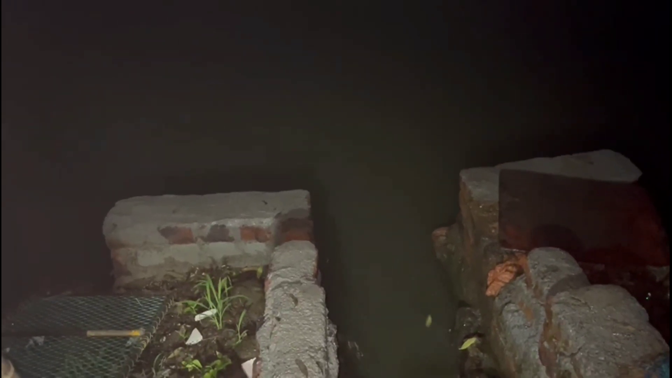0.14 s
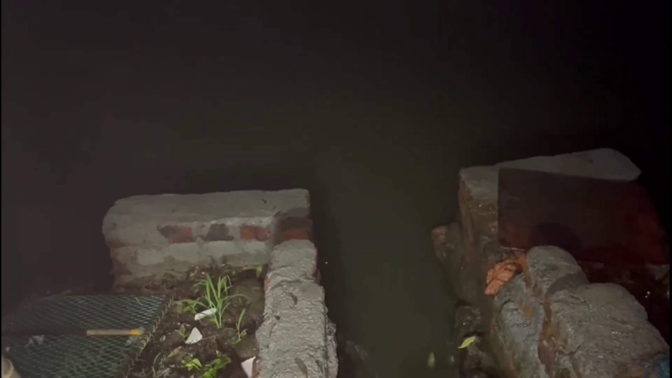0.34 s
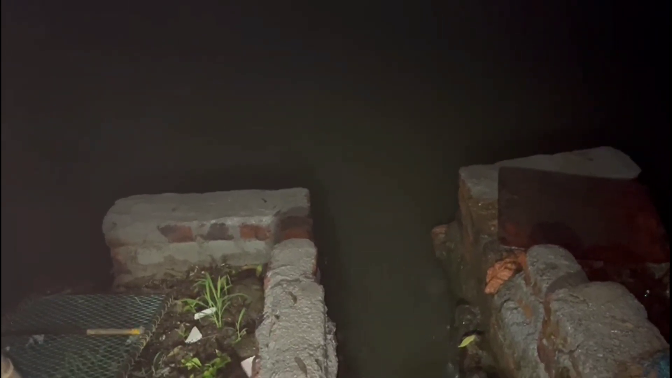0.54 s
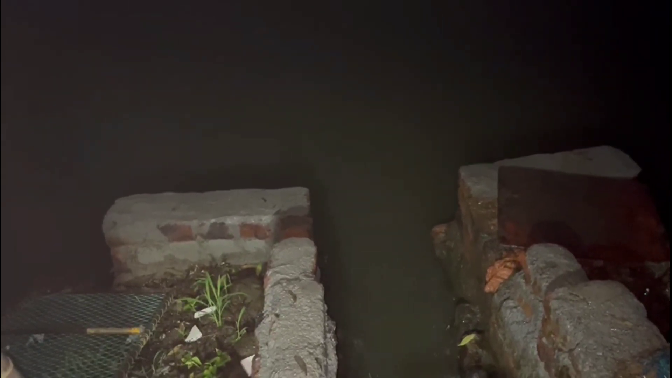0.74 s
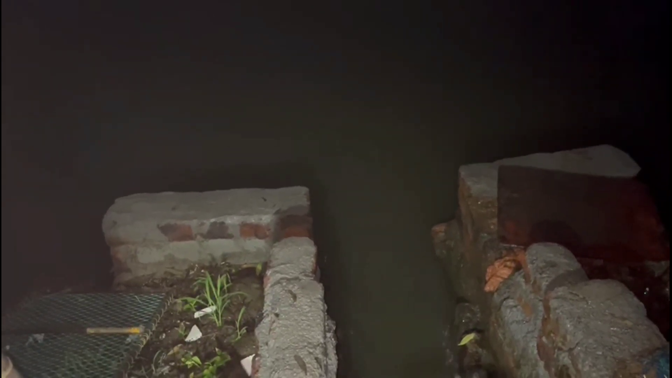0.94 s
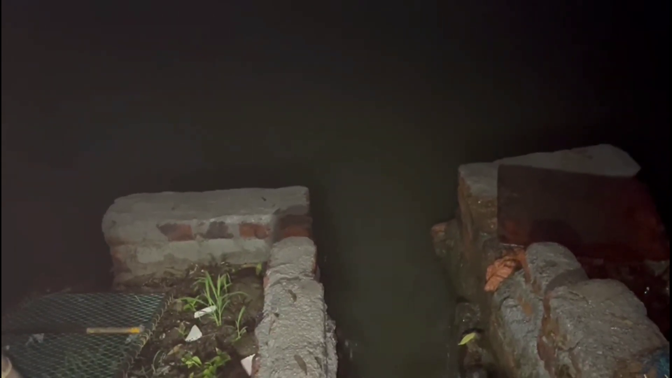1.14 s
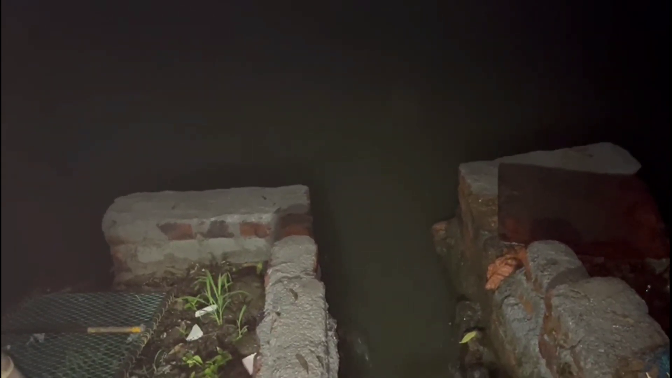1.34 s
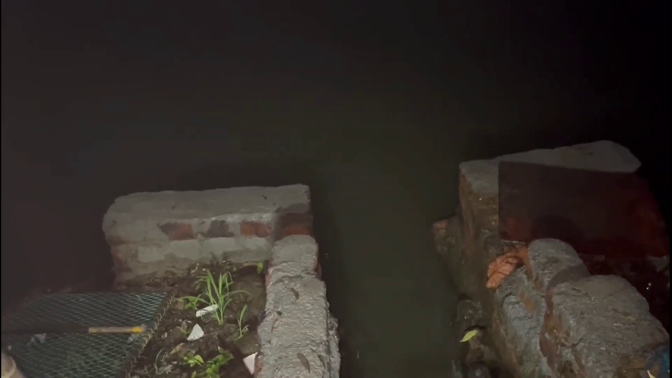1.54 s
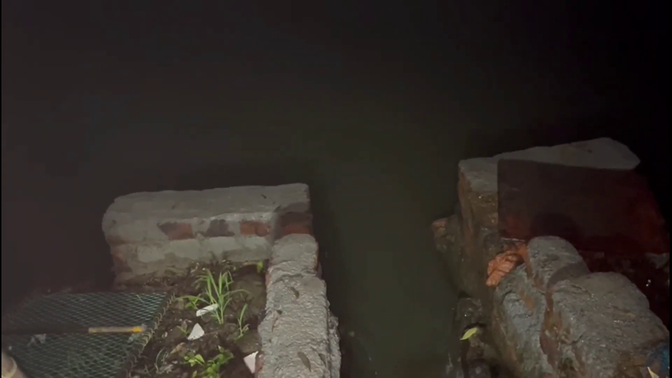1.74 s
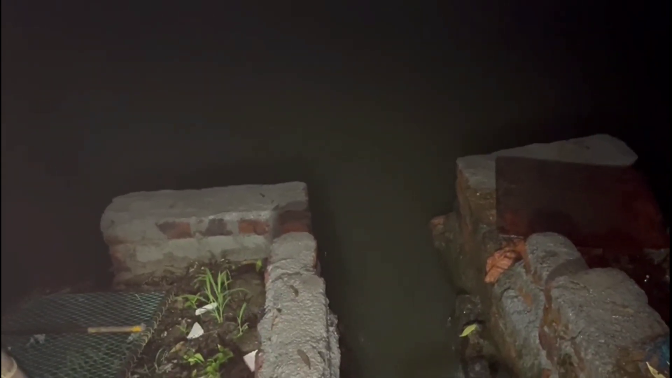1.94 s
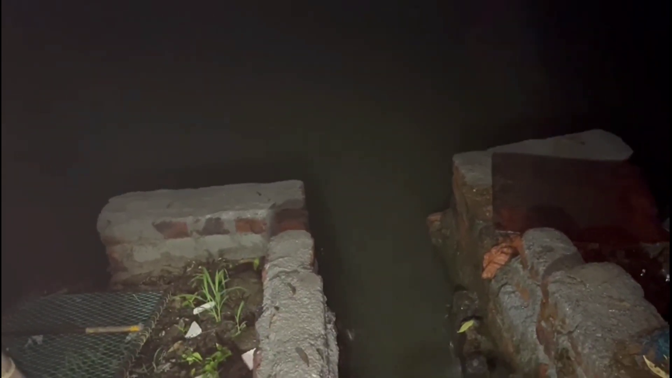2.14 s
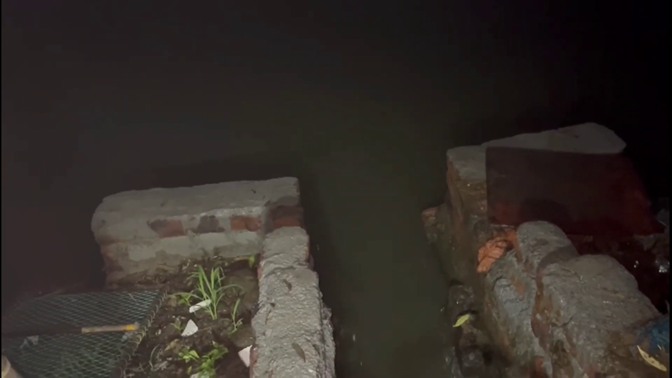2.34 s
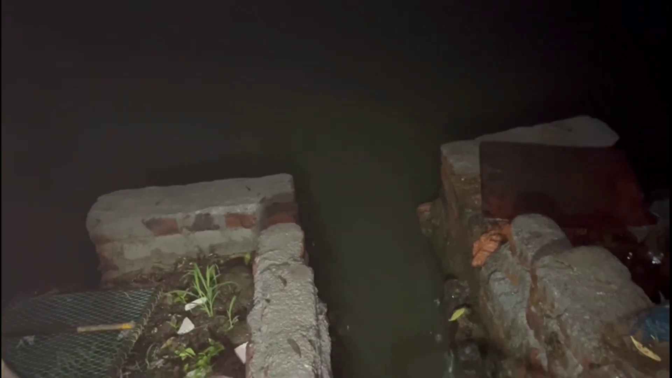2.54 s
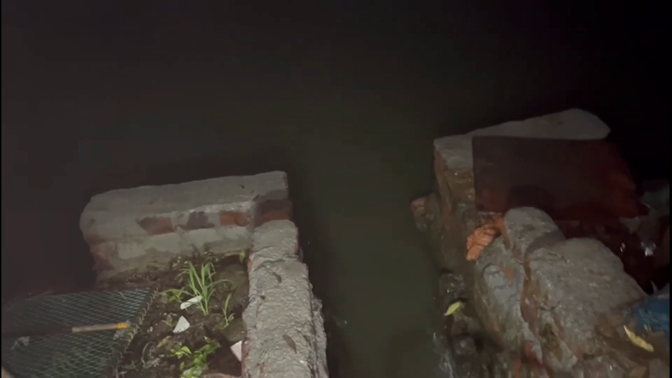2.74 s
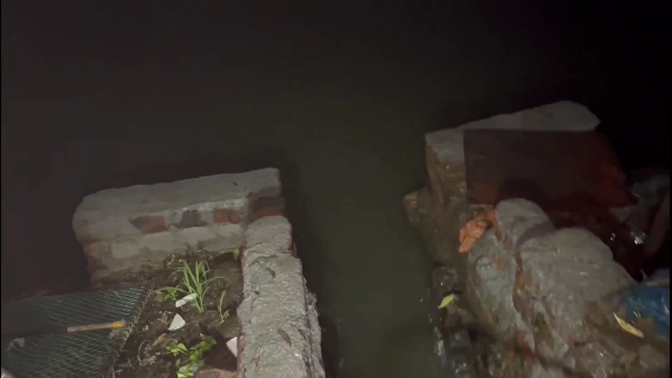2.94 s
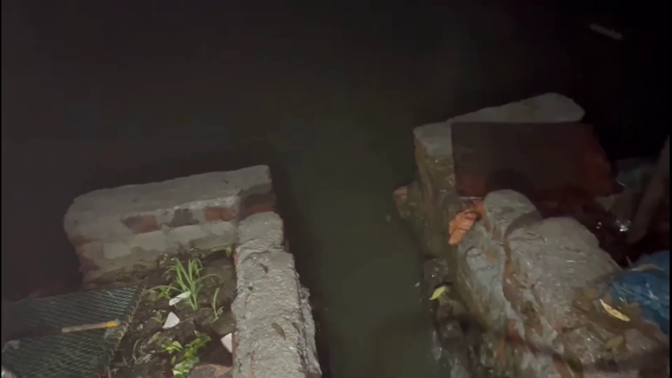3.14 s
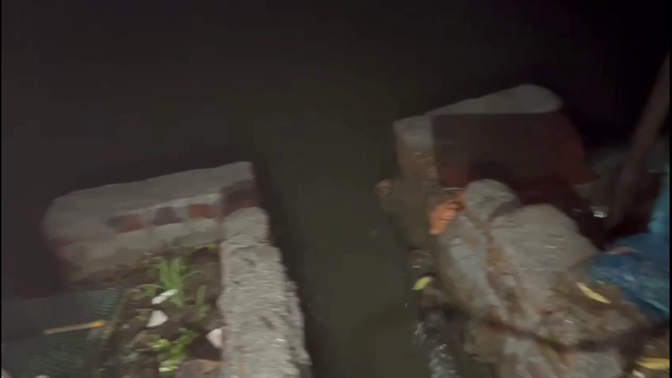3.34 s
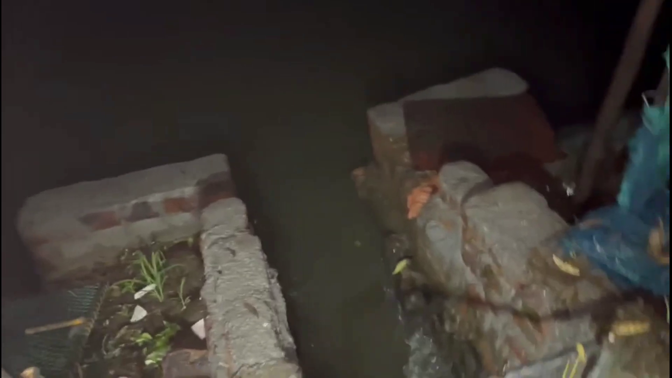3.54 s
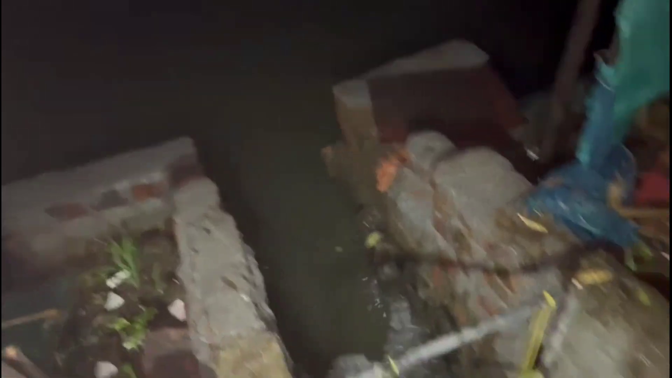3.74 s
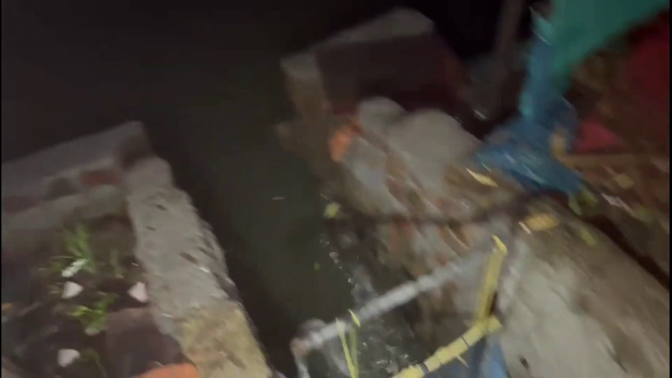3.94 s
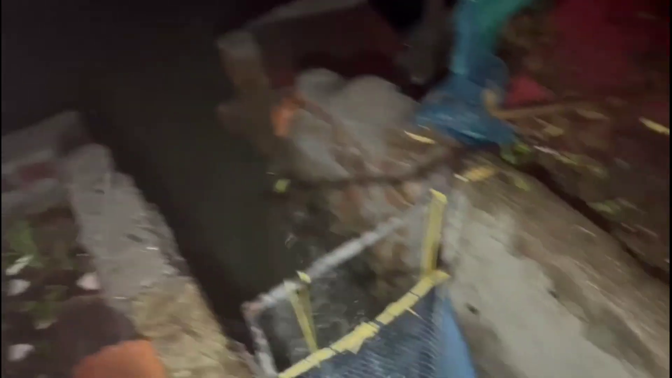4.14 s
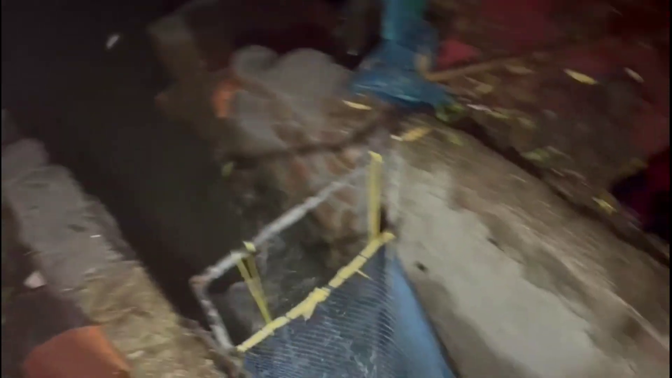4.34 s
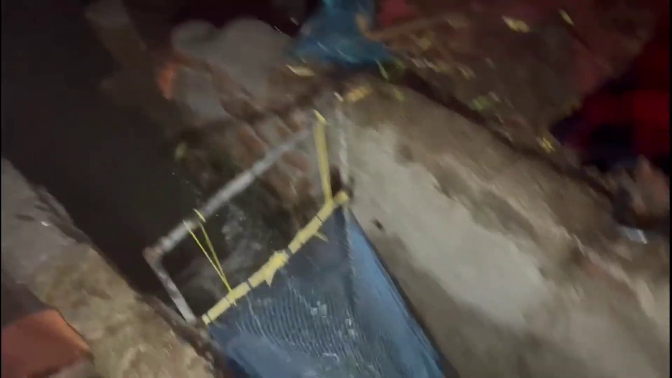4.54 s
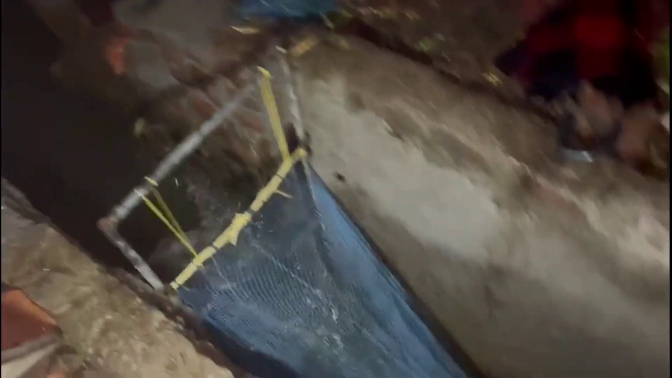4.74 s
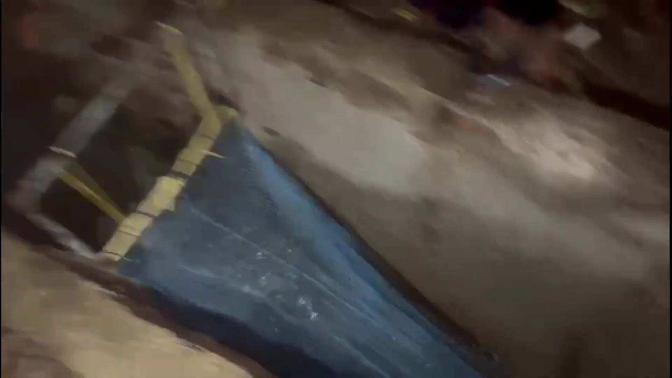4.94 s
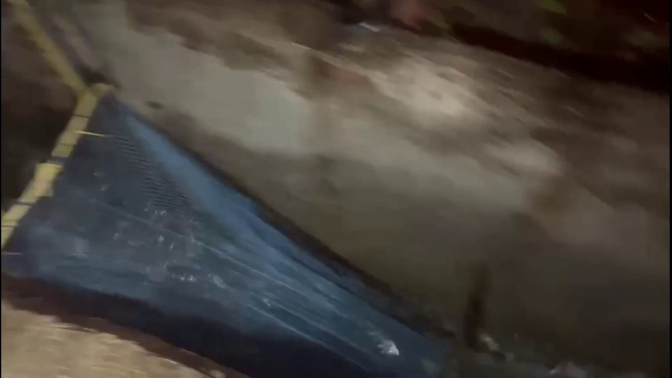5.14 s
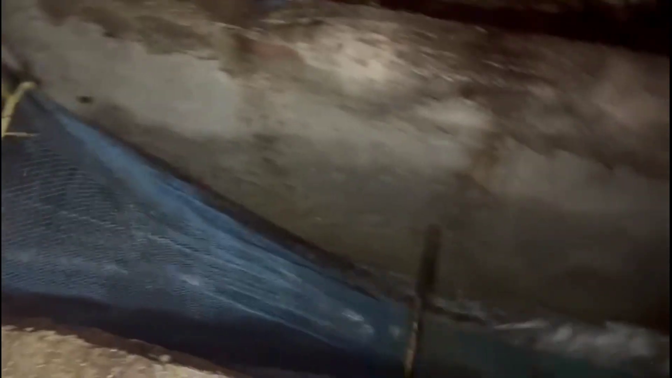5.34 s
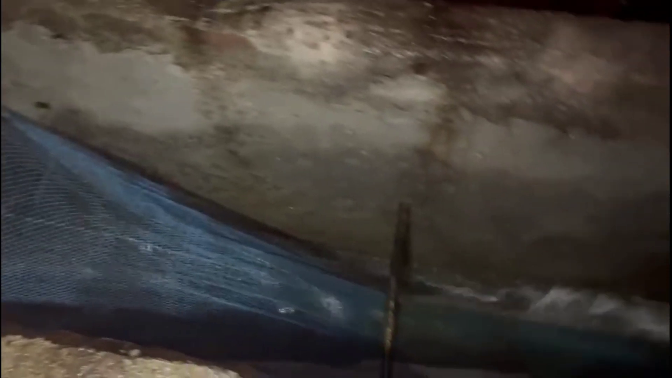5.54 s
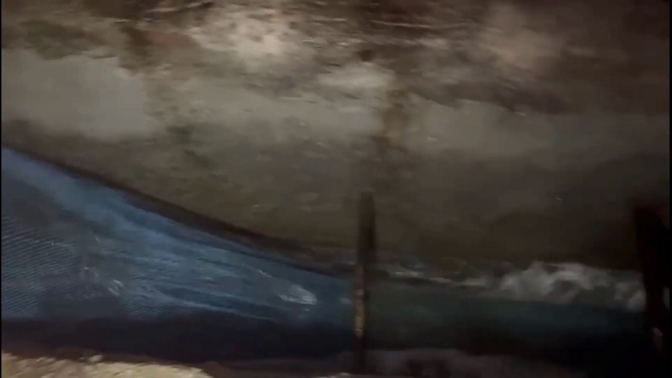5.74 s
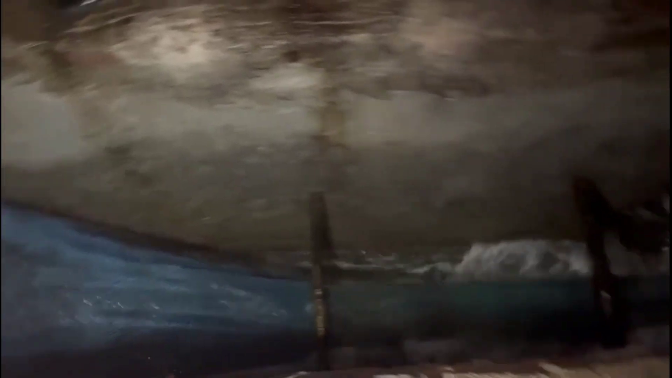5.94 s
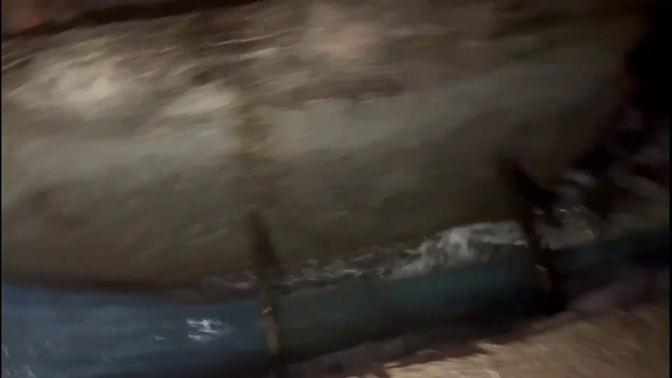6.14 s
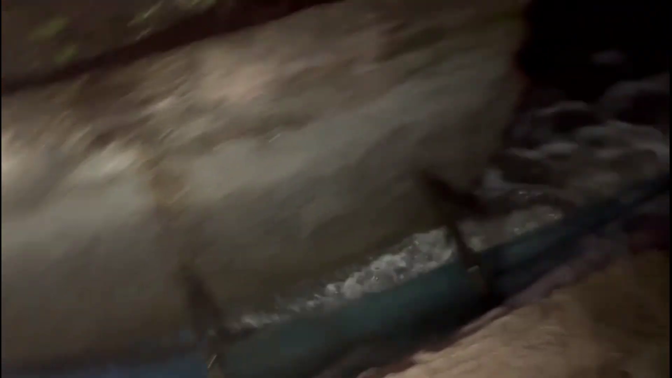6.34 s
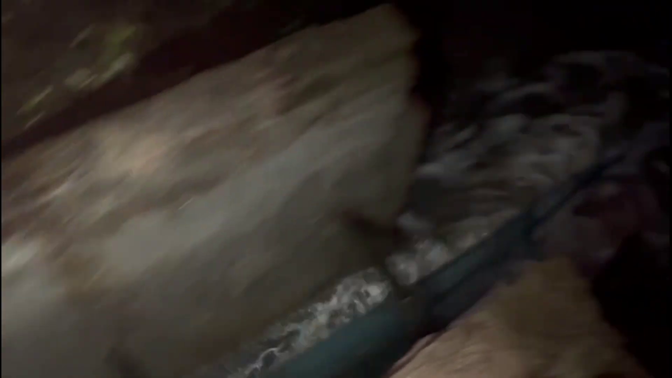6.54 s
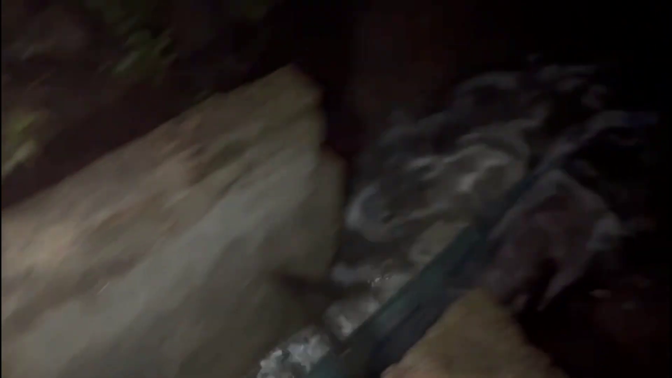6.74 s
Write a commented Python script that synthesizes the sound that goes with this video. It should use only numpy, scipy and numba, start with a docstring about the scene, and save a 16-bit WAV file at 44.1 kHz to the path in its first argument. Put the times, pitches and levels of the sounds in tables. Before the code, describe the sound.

Outdoors, water rushes without pause through a broken brick wall beside a pond. At first it babbles with fine spray hiss and scattered bright plinks. As the handheld microphone turns toward the narrow concrete chute, the sound gets fuller and more hollow, with low gurgles, quick heaves and small splashes close by.

```python
"""A gap in a stone wall by a pond: water pours through it and rushes down a narrow channel.
A hand-held camera and its microphone turn from the babbling inlet to the chute with its ringing gurgle.
Each band of the rush is noise of patchy loudness, mixed with crowds of ringing bubbles above the low plunge.
Fine spray lies on top; single bubbles plop close by, the flow heaves and splashes,
and the air between the walls rings; a fluttering notch near 1.5 kHz thins the mid of the mix."""
import sys
import numpy as np
from scipy import signal
from scipy.fft import rfft, irfft, next_fast_len
from scipy.io import wavfile
from scipy.ndimage import uniform_filter1d, map_coordinates
from numba import njit

SR = 44100
rng = np.random.default_rng(int(sys.argv[2]) if len(sys.argv) > 2 else 0)


def file_out(sig):
    """Save sig as 16-bit WAV at sys.argv[1]."""
    # one column per channel
    cols = np.atleast_2d(sig).T
    # limit, then scale
    lim = np.clip(cols, -1, 1)
    pcm = np.round(lim * 32767).astype(np.int16)
    wavfile.write(sys.argv[1], SR, pcm)


N = 303844

# where the camera points: (time [s], share of the chute [0-1])
TURN = [(0, 0), (3.0, 0.05), (4.6, 0.23), (5.2, 0.56), (6.3, 0.99), (6.89, 0.88)]
# relative colour of the water at the inlet: (frequency [Hz], mid level [dB], side level [dB])
INLET = [(131, 2.5, -31), (194, 1, -16.5), (228, -4.5, -41), (282, 0, -13.5), (410, -2, -10.5),
         (563, -1.5, -10), (774, -9, -15), (1165, -2.5, -18), (1700, -8.5, -9), (1800, -6.5, -22),
         (2400, -8, -29.5), (3080, -8.5, -20.5), (4500, -10, -5.5)]
# relative colour of the water in the chute: (frequency [Hz], mid level [dB], side level [dB])
CHUTE = [(130, -3.5, -23), (243, -2.5, -22), (315, -2.5, -17), (410, 0, -16), (490, -3, -10),
         (566, -1.5, -10.5), (830, -10.5, -12), (1257, -7, -10), (1330, -11.5, -7.5), (1666, -12, -9),
         (1720, -7, -39), (2740, -12.5, -12.5), (3580, -14, -16.5), (4420, -30, -25)]
# relative mid and side levels of the high hiss; from 7.7 to 9 kHz almost only side remains:
# (frequency [Hz], mid level [dB], side level [dB])
SPRAY = [(3700, 12, -8), (4530, 2, -6.5), (5640, -4, -11.5), (6200, -5, -13), (6590, -4.5, -8),
         (7470, -12, -3), (7700, -76, -3.5), (8960, -66, -5), (9670, -10, -3), (11160, -5.5, -45),
         (12250, -14, -60)]
# how the spray changes towards the chute: (frequency [Hz], gain [dB])
SPRAY_AT_CHUTE = [(4400, 0), (5600, 0.5), (7200, -0.5), (10500, 2.1)]
# relative colour of the plunge, nearly the same in both ears: (frequency [Hz], mid level [dB], side level [dB])
PLUNGE = [(20, -17, -41), (32, -10.5, -36), (44.7, -2.5, -32), (61.7, 3.5, -26), (75, 6, -25),
          (98, 1.5, -30), (135, -3, -24)]
# bearing of the water at each place, as the part of the side that follows the mid:
# (frequency [Hz], left louder [-1 to 1], left earlier [-1 to 1])
INLET_BEARING = [(100, 0.024, 0.32), (380, 0.5, -0.3), (680, -0.46, -0.21), (1400, -0.35, -0.2),
                 (1850, 0.29, 0.32), (2600, 0.0, 0.21), (4800, 0.38, 0.29), (7500, 0.06, -0.34)]
CHUTE_BEARING = [(100, 0.14, 0.1), (400, 0.27, 0.29), (900, 0.58, 0.34), (1500, 0.053, -0.14),
                 (2000, 0.08, 0.17), (3000, 0.37, 0.43), (5000, 0.16, 0.13), (7500, 0.07, -0.24)]
SPRAY_BEARING = [(4700, 0.28, .25), (5600, .15, -.15), (6700, .15, -.5), (8000, 0, 0), (10000, 0.018, .35),
                 (11500, 0, 0)]
# single bubbles close to the microphone, from low glugs to high plinks, before foam softens them:
# (time [s], level [dB], pitch [Hz], ring down to -60 dB [cycles])
PLOPS = [(0.249, -20, 3340, 90), (0.513, -13.5, 1080, 24), (0.609, -18, 1480, 58), (0.866, -15, 2600, 10),
         (0.978, -16, 2900, 10), (1.068, -15.5, 1180, 45), (1.437, -17, 447, 28), (1.728, -21, 3520, 80),
         (1.849, -15.5, 2070, 46), (2.065, -21, 3140, 47), (2.279, -21.5, 567, 39), (2.554, -14, 4350, 41),
         (2.672, -17.5, 425, 27), (2.746, -20, 1540, 49), (2.815, -19, 640, 32), (2.988, -25, 1770, 49),
         (3.219, -18, 3000, 30), (3.235, -9.5, 3680, 26), (3.831, -16, 275, 25), (4.697, -18, 404, 25),
         (4.787, -18.5, 347, 62), (5.1, -12.5, 420, 20), (5.192, -15.5, 406, 35), (5.365, -16.5, 383, 46),
         (5.487, -20, 355, 38), (5.555, -18, 388, 37), (5.601, -18, 370, 36), (5.695, -20, 372, 45),
         (5.822, -17, 530, 32), (5.915, -18, 380, 50), (6.101, -11, 501, 38), (6.118, -19, 620, 30),
         (6.175, -16, 375, 35), (6.363, -22, 312, 28), (6.471, -17.5, 410, 43), (6.585, -18, 558, 42)]
# course of each part of the flow: (level at the inlet [dB], level at the chute [dB],
# time when nearest [s], lift when nearest [dB], slow drift [dB])
PLUNGE_LEVEL = (-35, -31, 6.5, -1.1, 0.3)
GURGLE_LEVEL = (-30.5, -28, 5.5, 2, 0.27)
BABBLE_LEVEL = (-27, -28, 5, 1.5, 0)
# the spray comes out from behind the wall as the camera reaches the gap, before surges: (time [s], level [dB])
SPRAY_LEVEL = [(0, -33), (1.5, -33), (2.05, -32.5), (3.8, -32), (3.98, -29.6), (4.15, -31.5), (5.0, -31.5),
               (5.9, -31.5), (6.2, -32), (6.89, -32)]
# a narrow notch in the mid near 1.5 kHz, before its random flutter: (time [s], depth [0-1])
NOTCH = [(4.5, 0), (5.2, 0.6), (5.45, 0.25), (5.72, 0.42), (6.28, 0.2), (6.33, 0.95), (6.45, 0.25),
         (6.58, 0.85), (6.65, 0.7), (6.8, 1)]
# heaves, where a lump of water folds under: (time [s], lift of the plunge [dB], lift of the gurgle [dB])
HEAVES = [(0.67, 7.5, 1.5), (1.28, 2.5, 3.5), (1.43, 1, 2.3), (1.95, -1, 2.2), (2.3, 3, -0.5),
          (2.93, 0, 1.5), (3.25, 5.5, 0.5), (3.88, 3, 0.5), (4.31, 5.5, 1.5), (4.69, 7.5, 2), (4.8, -1, 3),
          (5.1, -1, 1.5), (5.22, 1, 2), (5.4, 7.5, 0), (5.57, -4, -0.5), (5.7, -1, 1), (5.82, -5, 2.5),
          (5.98, 5.5, 2.5), (6.11, -5, 2.5), (6.34, 5, 0.5), (6.6, 3, 1)]
# splashes against the stones: (time [s], lift of the babble [dB])
SPLASHES = [(2.3, 0.8), (2.755, 1.8), (2.89, 0.5), (3.222, 1.4), (3.31, 2), (3.97, 1.5), (4.34, 1),
            (4.48, 1.2), (5.1, 2.5), (5.18, 1.7), (5.27, 3), (5.37, 0.5), (6.08, 2)]

# time from the middle of a swell until its lift in dB has fallen to 1/e
NEAR_S, HEAVE_S, SPLASH_S = 1, 0.041, 0.029
# rates count the knots of a random curve per second; depths multiply that curve
SURGE_RATE, BABBLE_SURGE_DB, SPRAY_SURGE_DB = 24, 0.09, 0.43
NOTCH_START_HZ, NOTCH_END_HZ, NOTCH_WIDTH_HZ = 1610, 1470, 100
NOTCH_FLUTTER, NOTCH_FLUTTER_RATE = 0.44, 22  # flutter as a part of the depth
CHUTE_RING_HZ, CHUTE_RING_WIDTH_HZ, CHUTE_RING_DB = 394, 28, -42
RING_WANDER_HZ, RING_WANDER_RATE = 22, 5
TOP_HZ = 11850  # upper limit of the camera's sound


def amp(db):
    """Decibels to gain."""
    return 10 ** (np.asarray(db) / 20)


def unit(x):
    """x at rms 1."""
    return x / np.sqrt(np.mean(x ** 2) + 1e-20)


def along(rows, hz):
    """Each column after the frequency, read on a log axis."""
    knots_hz, *columns = np.transpose(rows)
    return [np.interp(np.log(hz + 1), np.log(knots_hz + 1), column) for column in columns]


def curves(rows):
    """One value per sample for each column after the time."""
    knots_s, *columns = np.transpose(rows)
    return [np.interp(np.arange(N) / SR, knots_s, column) for column in columns]


def wobble(rate):
    """A smooth random curve, rate knots a second."""
    knots = rng.standard_normal(int(N * rate / SR) + 4)
    return map_coordinates(knots, [np.arange(N) * rate / SR])


def filtered(x, response):
    """x times a complex response of frequency."""
    m = next_fast_len(N + SR // 4)  # zeros at the end keep the filter's tail off the start
    hz = np.fft.rfftfreq(m, 1 / SR)
    return irfft(rfft(x, m) * response(hz), m)[..., :N]


def band(hz, low_hz, high_hz, order=16):
    """Steep band-pass gain; neighbouring bands add up to even power."""
    below = (low_hz / (hz + 1)) ** order
    above = (hz / high_hz) ** order
    return 1 / np.sqrt((1 + below) * (1 + above))


def turbulence(patchy_db):
    """Two unrelated white noises with short patches of random gain in time and frequency."""
    spectrum = signal.stft(rng.standard_normal((2, N)), nperseg=512)[2]
    field = rng.standard_normal(spectrum.shape[1:])
    field = uniform_filter1d(field, size=7, axis=0)  # patches seven bins wide
    field = uniform_filter1d(field, size=10, axis=1)  # and ten frames long
    patchy = spectrum * amp(patchy_db * unit(field))
    return unit(signal.istft(patchy, nperseg=512)[1][:, :N])


def bubble(t, hz, cycles, rise):
    """A bubble swells within a cycle and rings for some more, its pitch rising as it nears the surface."""
    age = t * hz / cycles  # 1 when the ring is 60 dB down
    tone = np.sin(2 * np.pi * hz * t * (1 + rise * age / 2))
    onset = 1 - np.exp(-(2 * t * hz) ** 2)
    return tone * amp(-60 * age) * onset


@njit
def scatter(shapes, kinds, starts, sizes, length):
    """Sum of scaled copies of the shapes, each from its own start."""
    out = np.zeros(length + shapes.shape[1])
    for kind, start, size in zip(kinds, starts, sizes):
        for k in range(shapes.shape[1]):
            out[start + k] += size * shapes[kind, k]
    return out[:length]


def bubbles(rate, low_hz, high_hz, cycles, rise, spread_db, count=400):
    """Two unrelated crowds of bubbles, rate a second in each, their pitches even on a log axis."""
    hz = np.geomspace(low_hz, high_hz, count)
    t = np.arange(int(cycles / low_hz * SR)) / SR
    shapes = bubble(t, hz[:, None], cycles, rise)
    pitch, luck, sign, when = rng.random((int(2 * rate * N / SR), 4)).T
    kinds = (pitch * count).astype(int)
    starts = (when * 2 * N).astype(int)
    # most bubbles are faint, a few are loud; size in proportion to pitch evens the power per Hz
    loud_db = spread_db * np.minimum(-np.log(1 - luck), 4)
    sizes = hz[kinds] * np.sign(sign - .5) * amp(loud_db)
    crowd = scatter(shapes, kinds, starts, sizes, 2 * N).reshape(2, N)
    return unit(crowd) * np.sqrt(2 * (high_hz - low_hz) / SR)  # as dense in power as white noise


def placed(water, colour, bearing, low_hz, high_hz):
    """One band of the water as left and right hear it, its mid at rms 1."""
    def response(hz):
        mid, side = amp(along(colour, hz)) * band(hz, low_hz, high_hz)
        louder, earlier = along(bearing, hz)
        diffuse = np.sqrt(np.clip(1 - louder ** 2 - earlier ** 2, 0, 1))
        # a quarter-turn of phase puts one ear ahead of the other
        return np.array([mid, side * (louder + 1j * earlier), side * diffuse])
    direct, scattered = water
    mid, lean, spread = filtered(np.array([direct, direct, scattered]), response)
    return np.array([mid + lean + spread, mid - lean - spread]) / np.std(mid)


def turning(source, low_hz, high_hz):
    """The inlet gives way to the chute at even power as the camera turns."""
    share = np.clip(curves(TURN)[0], 0, 1)
    inlet = placed(source(), INLET, INLET_BEARING, low_hz, high_hz)
    chute = placed(source(), CHUTE, CHUTE_BEARING, low_hz, high_hz)
    return np.sqrt(1 - share) * inlet + np.sqrt(share) * chute


def loudness(inlet_db, chute_db, nearest_s, lift_db, drift_db):
    """Level in dB of one part of the flow: it follows the turn, is lifted or dips when nearest, and drifts."""
    near = np.exp(-((np.arange(N) / SR - nearest_s) / NEAR_S) ** 2)
    turned_db = inlet_db + (chute_db - inlet_db) * curves(TURN)[0]
    return turned_db + lift_db * near + drift_db * wobble(5.5)


def plunge():
    """The falling sheet of water makes whole clouds of air throb: low noise of unsteady level."""
    throb = amp(0.61 * wobble(14))
    return throb * placed(rng.standard_normal((2, N)), PLUNGE, CHUTE_BEARING, low_hz=18, high_hz=130)


def gurgle():
    """Large pockets of air fold under and ring between the walls."""
    pockets = bubbles(rate=200, low_hz=150.5, high_hz=800, cycles=30, rise=0.068, spread_db=1.4)
    return turbulence(patchy_db=0.45) + amp(-1) * pockets


def babble():
    """A dense crowd of pea-sized bubbles breaks out of the white water."""
    crowd = bubbles(rate=1700, low_hz=704.7, high_hz=4836, cycles=49.6, rise=0.084, spread_db=2.5)
    return (turbulence(patchy_db=1.1) + crowd) * amp(0.37 * wobble(90))


def spray():
    """Droplets patter back on the stream in little bursts, each leaving a tiny ringing bubble."""
    drops = bubbles(rate=1600, low_hz=3980, high_hz=11730, cycles=28, rise=0.066, spread_db=0.5)
    bursts = amp(0.58 * wobble(120))
    fizz = (turbulence(patchy_db=1.74) + amp(-5) * drops) * bursts
    at_inlet = placed(fizz, SPRAY, SPRAY_BEARING, low_hz=4197, high_hz=13400)
    at_chute = filtered(at_inlet, lambda hz: amp(along(SPRAY_AT_CHUTE, hz)[0]))
    return at_inlet + curves(TURN)[0] * (at_chute - at_inlet)


def chute_ring():
    """The churning keeps the air between the walls ringing: resonant noise whose pitch wanders."""
    def walls(hz):
        return 1 / (1 + 1j * (hz - CHUTE_RING_HZ) / CHUTE_RING_WIDTH_HZ) ** 2
    ring = signal.hilbert(unit(filtered(rng.standard_normal(N), walls)))
    shift_hz = RING_WANDER_HZ * wobble(RING_WANDER_RATE)
    wander = np.exp(2j * np.pi * np.cumsum(shift_hz) / SR)
    return np.sqrt(np.clip(curves(TURN)[0], 0, 1)) * (ring * wander).real


def plops(rows, rise):
    """Near bubbles stand out of the rush for an instant; foam softens their edges."""
    out = np.zeros(N + SR)
    t = np.arange(SR // 6) / SR
    for start_s, db, hz, cycles in rows:
        start = round(start_s * SR)
        out[start:start + len(t)] += amp(db) * bubble(t, hz, cycles, rise)
    return filtered(out[:N], lambda hz: band(hz, low_hz=200, high_hz=5200))


def swells(times, lifts_db, length_s):
    """Brief bell-shaped lifts or dips of the flow, in dB."""
    t = np.arange(N) / SR
    return sum(db * np.exp(-((t - s) / length_s) ** 2) for s, db in zip(times, lifts_db))


def notched(pair):
    """Takes a narrow band out of the mid by a fluttering amount; its centre shifts down with the turn."""
    mid = pair.mean(axis=0)

    def narrow_band(centre_hz):
        return filtered(mid, lambda hz: np.exp(-np.abs((hz - centre_hz) / NOTCH_WIDTH_HZ) ** 3))
    high = narrow_band(NOTCH_START_HZ)
    low = narrow_band(NOTCH_END_HZ)
    cancelled = high + np.clip(curves(TURN)[0], 0, 1) * (low - high)
    flutter = 1 + NOTCH_FLUTTER * wobble(NOTCH_FLUTTER_RATE)
    return pair - np.clip(curves(NOTCH)[0] * flutter, 0, 1) * cancelled


def scene():
    """All parts of the flow; a heave moves plunge and gurgle, a surge moves babble and spray together."""
    surge = wobble(SURGE_RATE)
    heave_s, plunge_db, gurgle_db = np.transpose(HEAVES)
    low_db = loudness(*PLUNGE_LEVEL) + swells(heave_s, plunge_db, HEAVE_S)
    low = amp(low_db) * plunge()
    body_db = loudness(*GURGLE_LEVEL) + swells(heave_s, gurgle_db, HEAVE_S)
    body = amp(body_db) * turning(gurgle, low_hz=129.4, high_hz=776)
    splash_db = swells(*np.transpose(SPLASHES), SPLASH_S)
    middle_db = loudness(*BABBLE_LEVEL) + BABBLE_SURGE_DB * surge + splash_db
    middle = amp(middle_db) * turning(babble, low_hz=728, high_hz=3630)
    high = amp(curves(SPRAY_LEVEL)[0] + SPRAY_SURGE_DB * surge) * spray()
    ring = amp(CHUTE_RING_DB) * chute_ring()
    near = plops(PLOPS, rise=0.062)
    return notched(low + body + ring + middle + high + near)


def record(dry):
    """The camera keeps next to nothing above its band limit: a very steep low-pass."""
    return filtered(dry, lambda hz: 1 / np.sqrt(1 + (hz / TOP_HZ) ** 300))


dry = scene()
out = record(dry)
file_out(out)
```